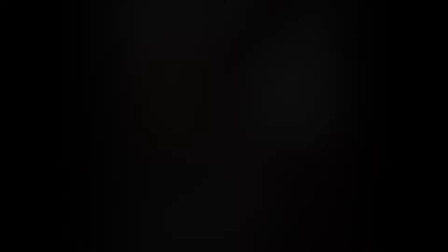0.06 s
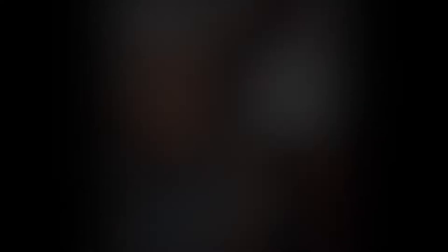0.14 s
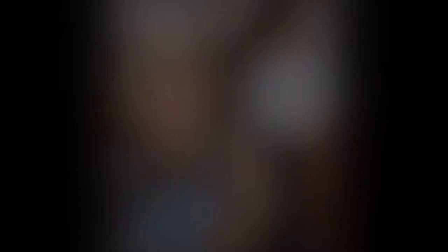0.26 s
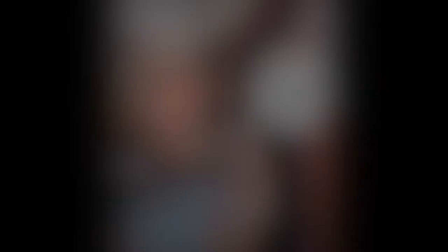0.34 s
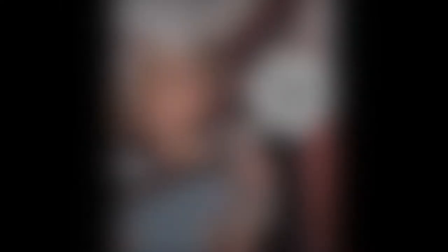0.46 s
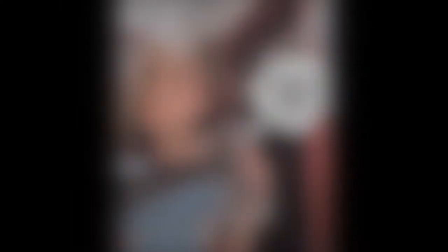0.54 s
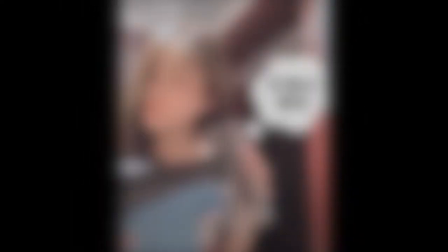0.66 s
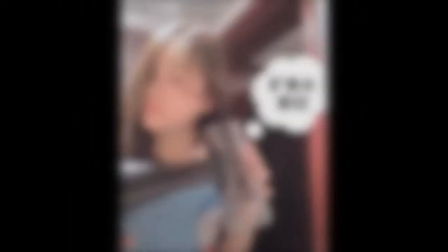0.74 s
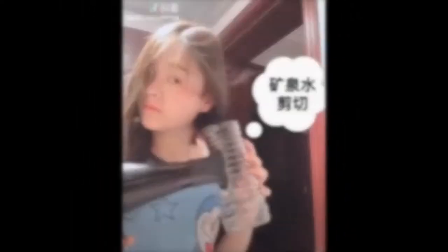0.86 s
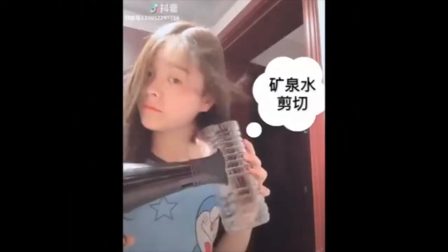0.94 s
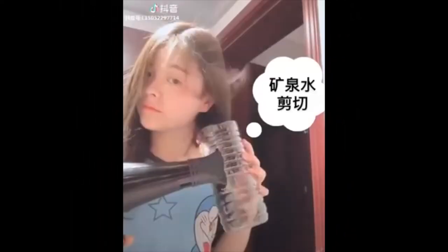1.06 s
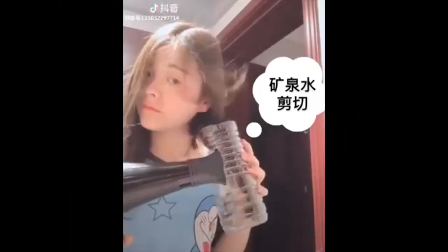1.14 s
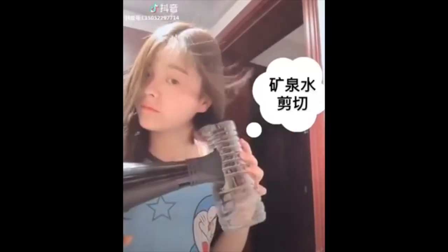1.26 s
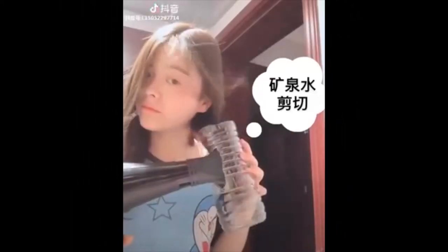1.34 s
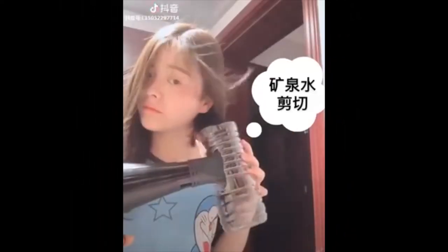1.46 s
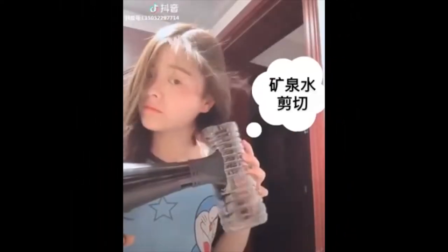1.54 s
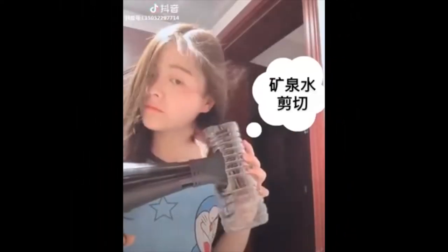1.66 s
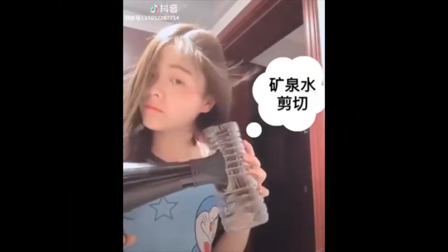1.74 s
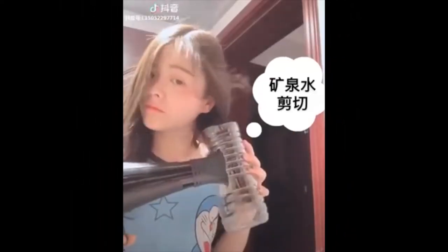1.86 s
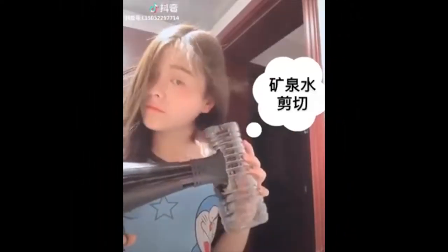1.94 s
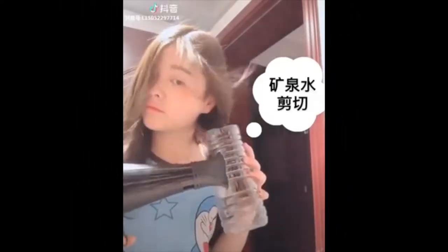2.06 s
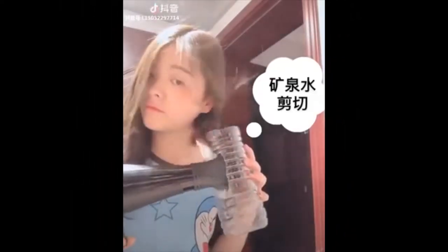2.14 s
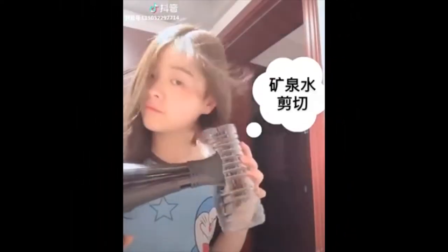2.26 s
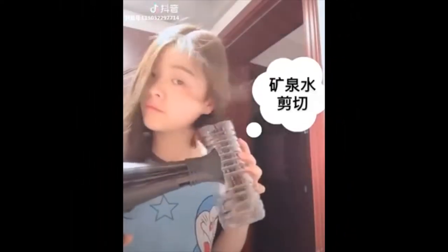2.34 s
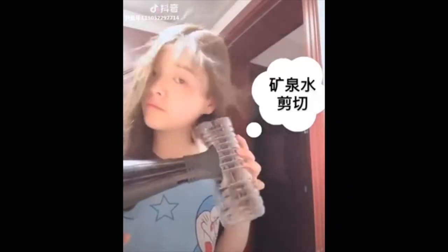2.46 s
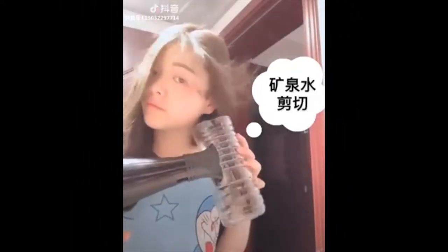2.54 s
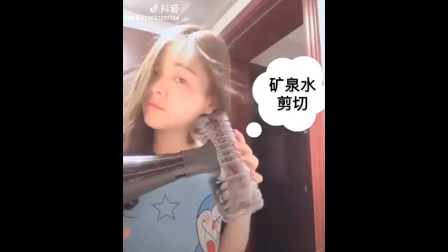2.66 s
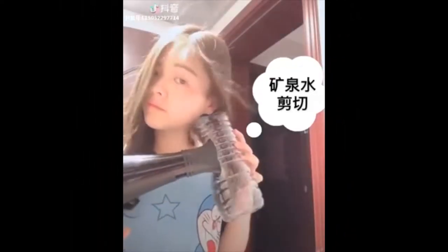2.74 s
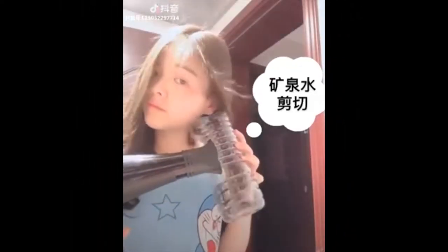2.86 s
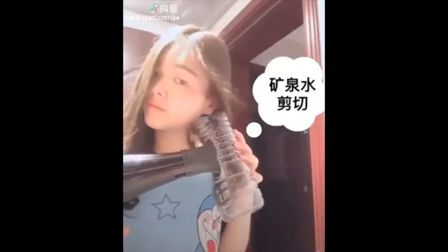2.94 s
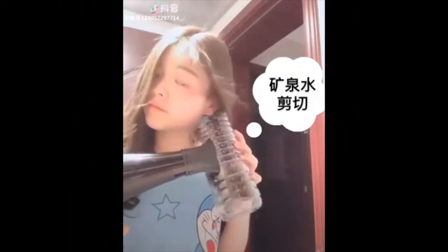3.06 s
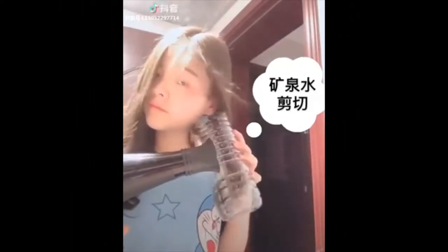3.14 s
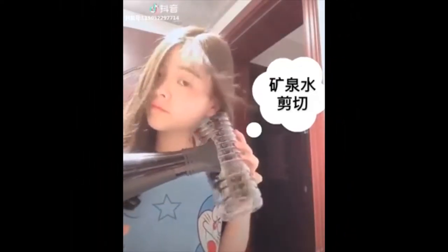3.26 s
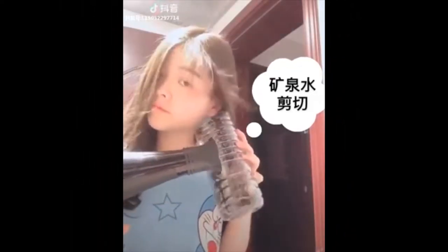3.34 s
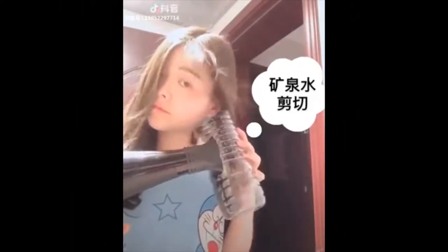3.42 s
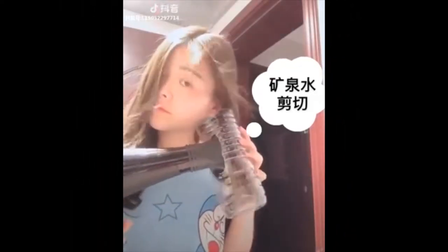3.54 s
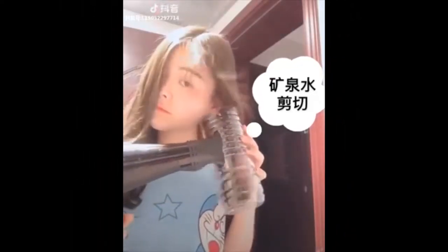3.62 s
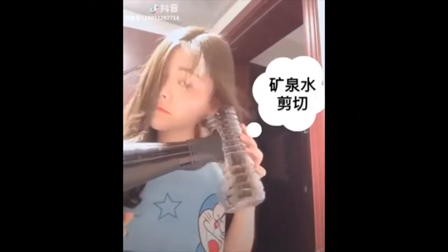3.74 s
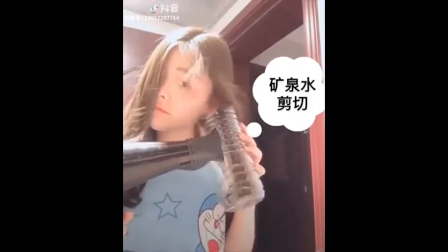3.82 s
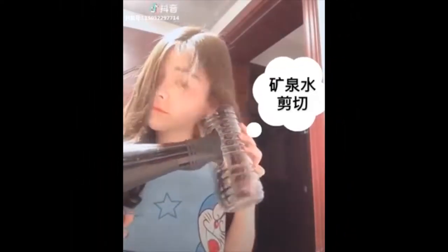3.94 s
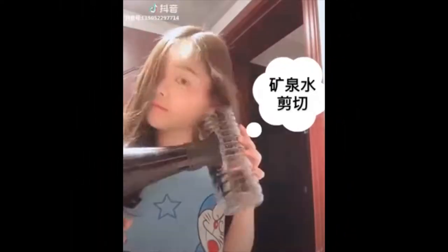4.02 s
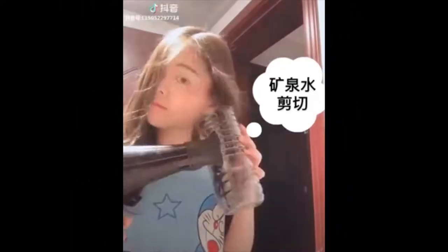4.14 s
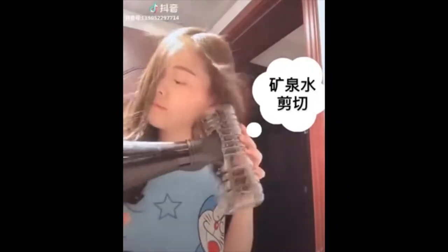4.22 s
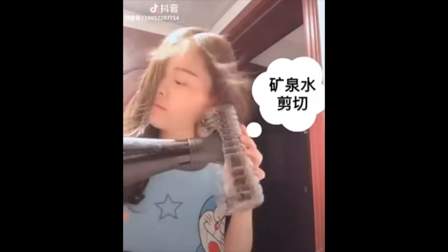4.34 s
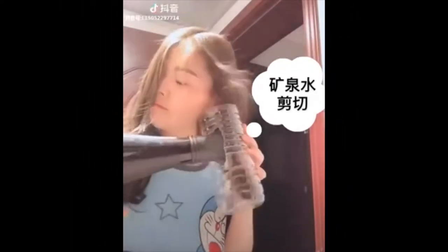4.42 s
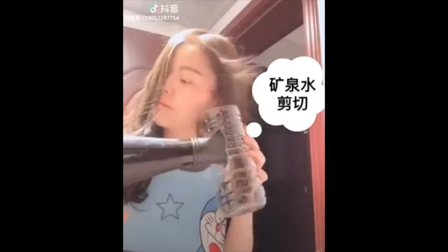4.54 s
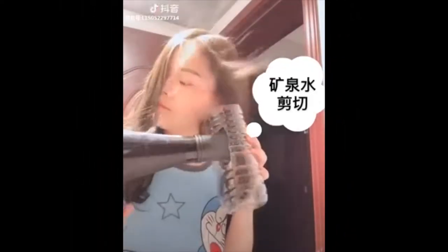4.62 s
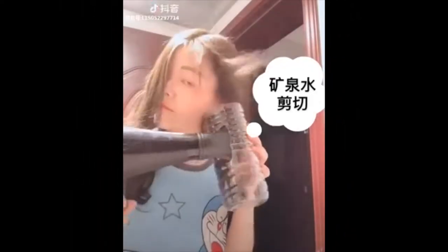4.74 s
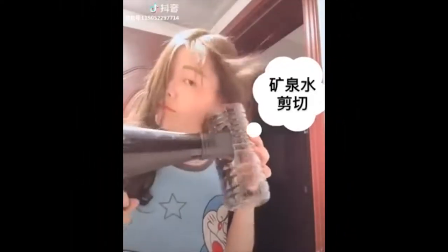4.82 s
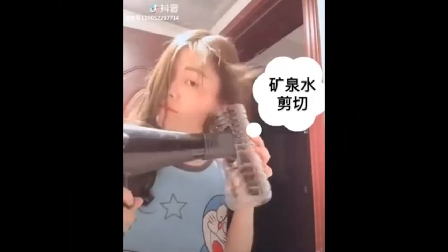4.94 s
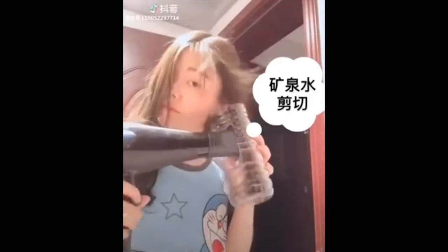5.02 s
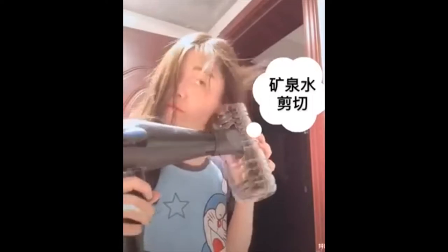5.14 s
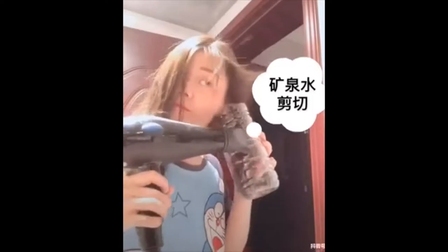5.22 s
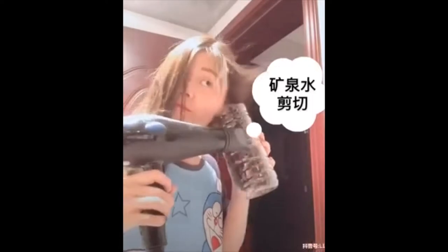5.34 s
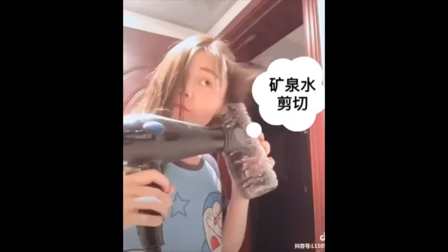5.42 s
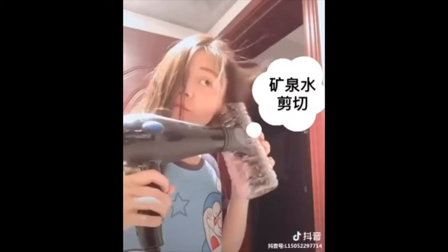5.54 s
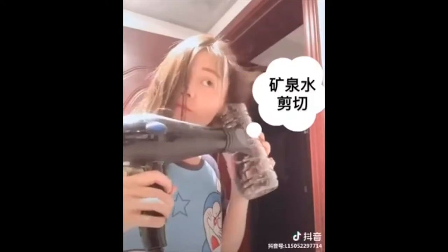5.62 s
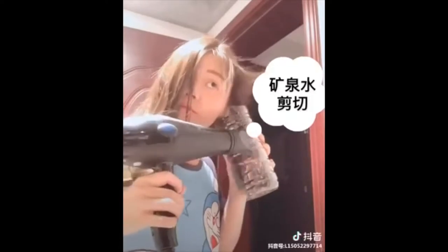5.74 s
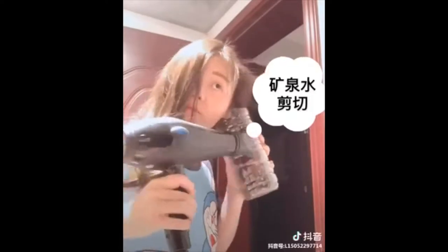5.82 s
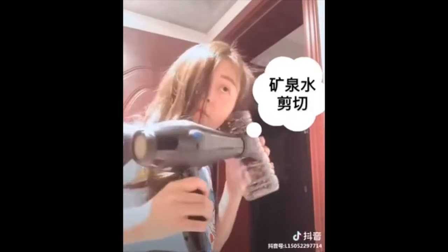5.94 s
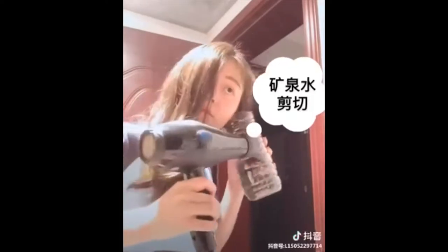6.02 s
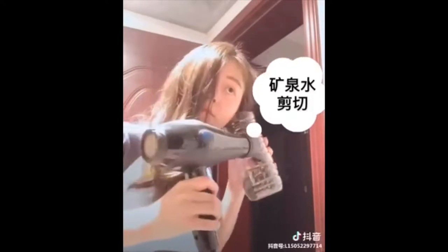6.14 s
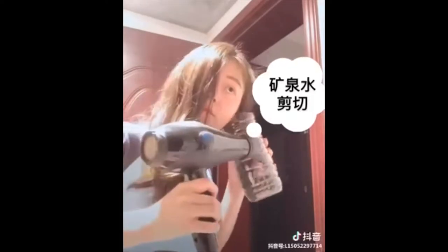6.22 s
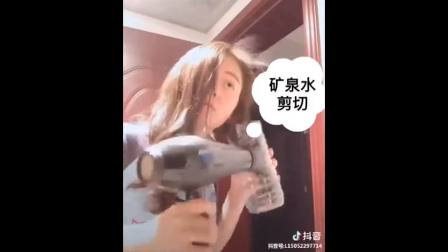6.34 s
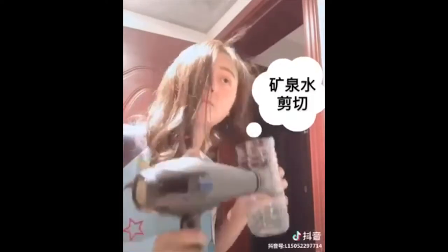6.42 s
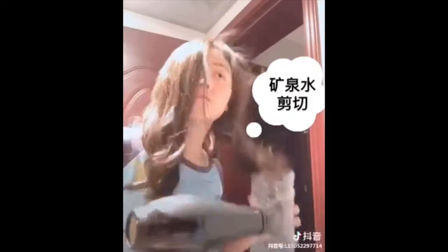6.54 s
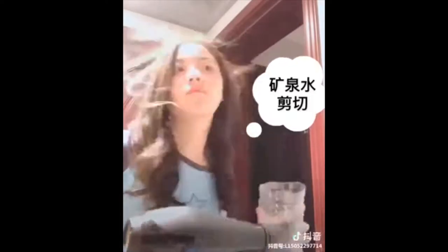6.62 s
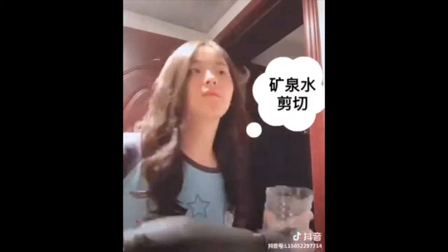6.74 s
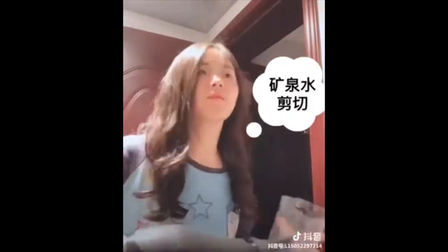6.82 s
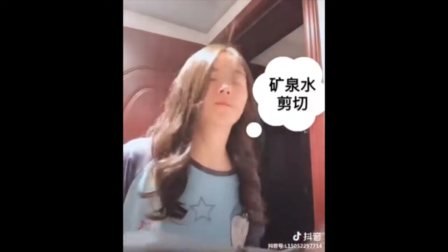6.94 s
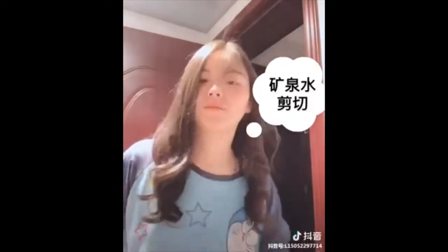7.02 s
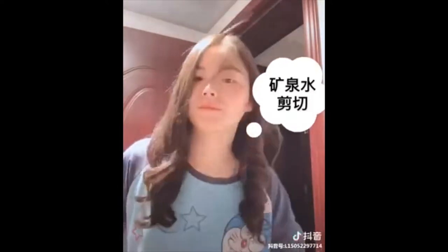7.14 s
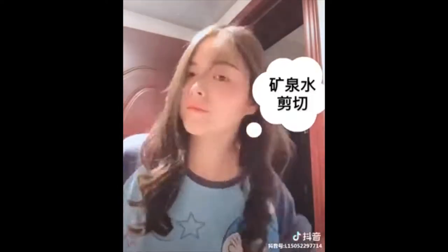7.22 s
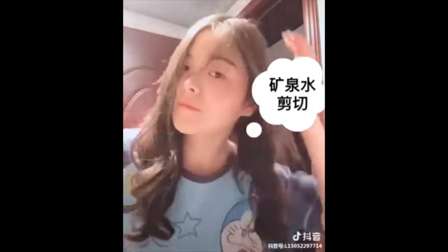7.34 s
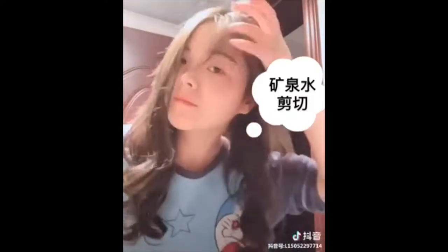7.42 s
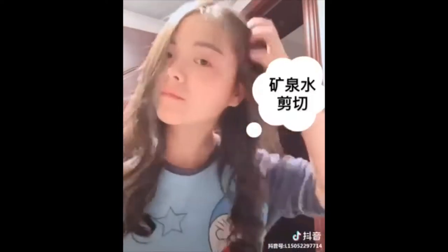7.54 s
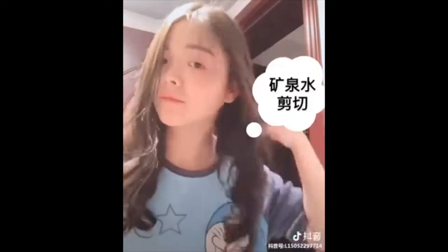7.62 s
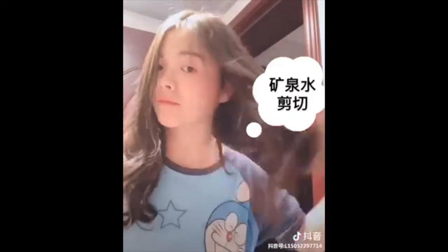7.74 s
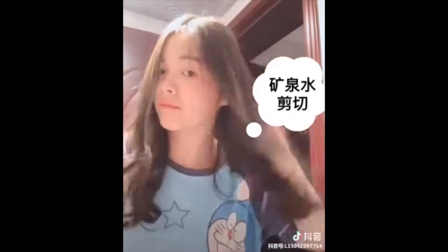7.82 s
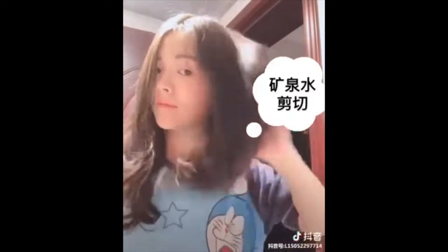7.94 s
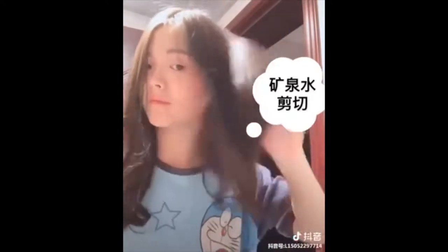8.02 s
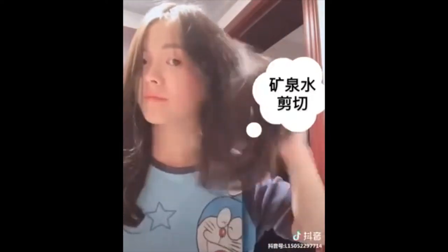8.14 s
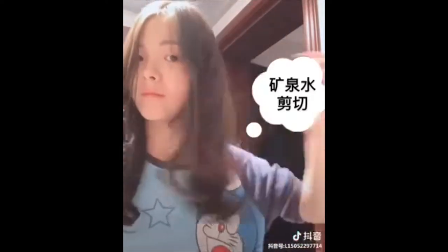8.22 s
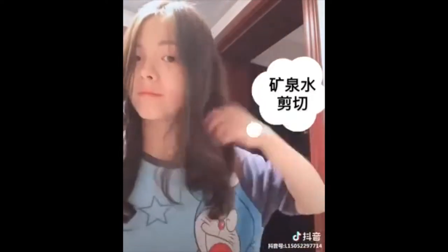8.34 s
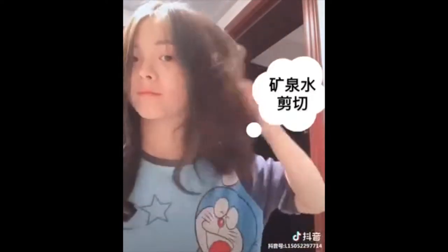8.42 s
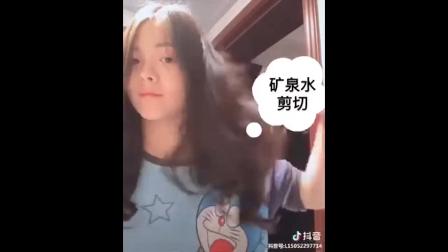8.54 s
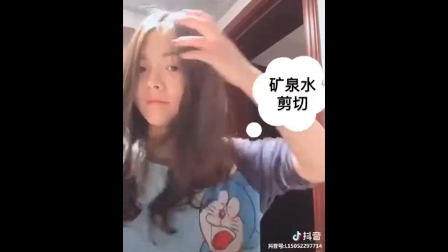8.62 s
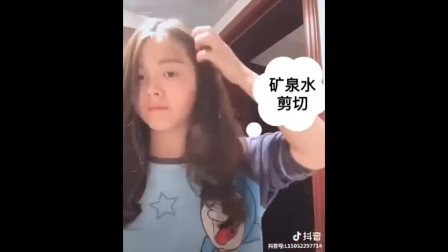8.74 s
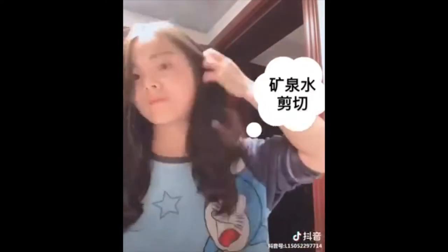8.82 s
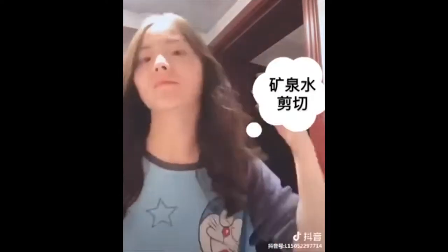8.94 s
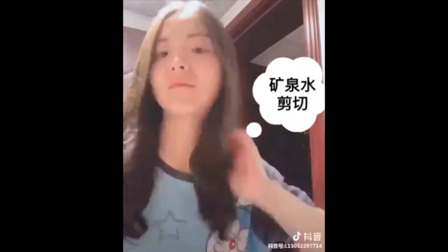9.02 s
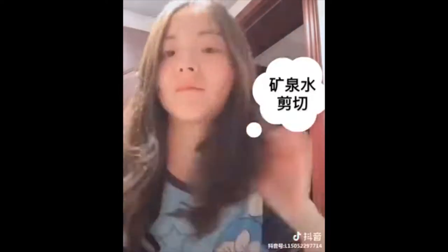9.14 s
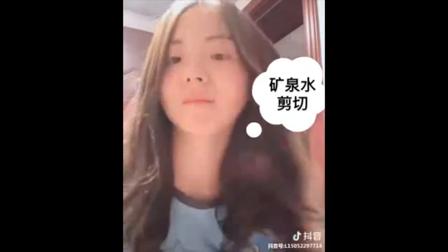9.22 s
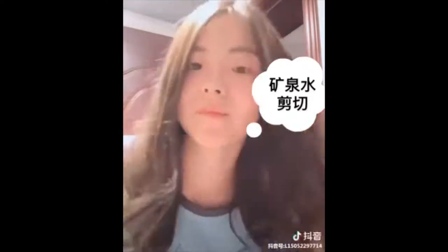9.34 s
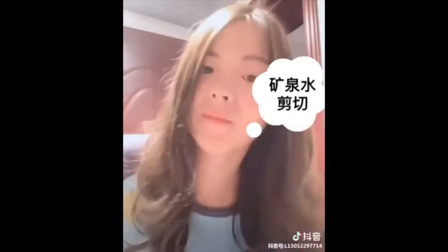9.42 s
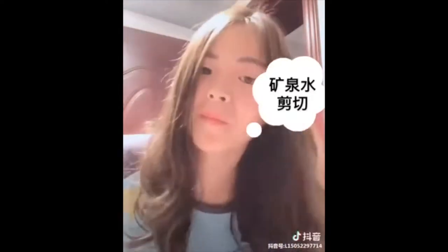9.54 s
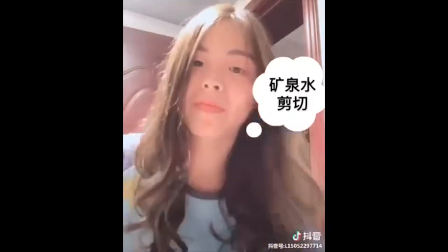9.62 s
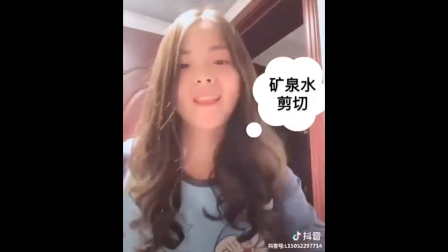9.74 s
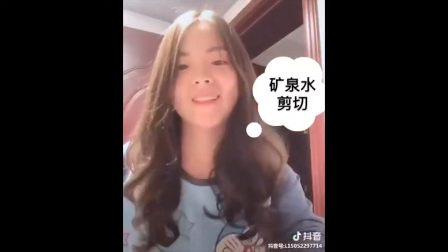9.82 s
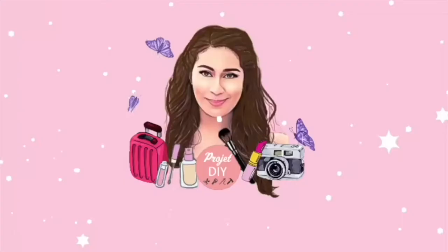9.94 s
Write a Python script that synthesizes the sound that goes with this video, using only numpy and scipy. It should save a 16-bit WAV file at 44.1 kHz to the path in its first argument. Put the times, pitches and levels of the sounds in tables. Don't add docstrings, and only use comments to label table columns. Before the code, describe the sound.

Smoothly fading in from silence, rough blown air roars through a plastic bottle, close and nearly mono, with fluttering resonances. After several steady seconds it swells into a sharper hiss, winds down quickly, and the dryer knocks and drops on a resonant tabletop, distorting briefly and bouncing. The small room falls quiet apart from low murmur, dull distant thuds, soft brushing, small ticks and final light taps.

```python
import sys
import numpy as np
from scipy import signal
from scipy.io import wavfile
from scipy.ndimage import uniform_filter1d

SR = 44100
rng = np.random.default_rng(int(sys.argv[2]) if len(sys.argv) > 2 else 0)


def int16_out(signal):
    q = np.round(np.clip(np.atleast_2d(signal).T, -1, 1) * 32767)
    wavfile.write(sys.argv[1], SR, q.astype(np.int16))


def invert_db(x):
    u = np.asarray(x, float) / 20
    return 10 ** u


N = 439677
T = np.arange(N) / SR

# (pitch [Hz], level per Hz [dB])
AIR = [(24, -70.5), (40, -57.5), (85, -19), (173, -20.5), (213, -20), (395, -0.5), (519, -13.5), (749, -20),
       (986, -14), (1270, -16), (2050, -28), (2300, -27), (2580, -19.5), (4460, -20), (9500, -29.5),
       (12400, -68), (20900, -120)]
# (pitch [Hz], width [Hz], level [dB])
HOLLOWS = [(58.7, 40, -37), (166, 32, -34), (268.5, 27, -6.5), (313.9, 19.6, -1), (337, 23, -3.5),
           (391.6, 34, -1), (486.5, 17, -13.5)]
# (pitch [Hz], width [Hz], level [dB])
PIPES = [(536.4, 28, -2), (626, 16.6, -3), (802, 37, -6), (884, 20, -1), (1074, 26, -8.5), (1128, 60, -8.5),
         (1273, 53.5, -0.5), (1693, 90, -10), (1818, 64, -9), (2303, 93, -7.5), (2890, 21, -13),
         (3296, 88, -15)]
# (pitch [Hz], width [Hz], level [dB])
ROOM_TONES = [(92, 16.6, -22), (134.8, 26, -21.5), (222.7, 24.8, -9.5), (692.8, 16.7, -19)]
# (pitch [Hz], level [dB])
WHINE = [(4340, -44), (8680, -48)]
# (time [s], spread [s], pitch [Hz], width [Hz], level over the hiss [dB])
SWING = [(1.2, .5, 4400, 250, -17), (3, 1.2, 3680, 200, -13.5), (4.6, 0.6, 3840, 300, -12),
         (5.95, 0.21, 6920, 900, -3), (6.05, 0.31, 6420, 500, -7.5), (6.301, 0.36, 5290, 400, -5),
         (6.45, 0.37, 4250, 400, -5.5), (6.6, 0.22, 6570, 350, -4), (6.301, 0.27, 9000, 600, -18)]
# (steady level [dB], share of the aim gain, run-down [dB per s])
LAYERS = [
    (-21.5, 0.11, 70),
    (-28, 0.4, 106),
    (-32, 0.23, 86),
    (-46.5, 0.94, 94),
]
# (time [s], gain [dB])
AIM = [(0, -0.5), (1.4, 1), (3.2, -1), (4.4, 0.5), (5, 2), (5.5, 5), (5.9, 5.5), (6.25, 7), (6.55, 6),
       (6.7, 7.5)]
SWITCH_OFF_S, CUT_S = 6.695, 6.97

# (time [s], boom level [dB], crack level [dB], crack spread [s])
BLOWS = [(6.895, -20, -30, .023), (7.011, -10, -21, .012), (7.026, -24, -28, 0.015),
         (7.258, -7, -33.5, 0.01), (7.267, 5.5, -26.5, .0091), (7.279, -8, -40, .006),
         (7.296, -4, -34.5, .011), (7.315, -0.5, -35, .0047), (7.335, 5, -30, .0072),
         (7.355, -20, -31, .01), (7.386, -8, -34, .011), (7.407, -11, -40.5, .0076), (7.423, -8, -51, .01),
         (7.444, -9.5, -46, .01), (7.48, -11.5, -31, .015), (7.499, -9, -48, .01),
         (7.521, -14, -45.5, .017), (7.566, -9, -39, .012), (7.597, -12.5, -43, .011),
         (7.64, -15, -42, .015), (7.672, -13, -44, .017), (7.705, -16, -57, .012)]
# (pitch [Hz], level [dB], time to fade by 60 dB [s])
TABLE = [(400, 0.5, 0.066), (361.3, -15, .12), (470, -18.5, 0.071), (242, -21.5, 0.21), (830, -29, .06),
         (620, -31.5, 0.11), (1585, -32.5, .08)]
# (pitch [Hz], width [Hz], level [dB])
SHELL_DULL = [(490, 30, 14), (1130, 69, -3.5), (1410, 150, 0.5), (2130, 160, -0.5), (2690, 920, -5.5),
              (1475, 6100, -15.5)]
# (pitch [Hz], width [Hz], level [dB])
SHELL_BRIGHT = [(4250, 700, 4.5), (5160, 120, -1), (5430, 450, 2), (6850, 550, 3.5), (8600, 2500, -10),
                (11800, 3000, -23.5)]
# (time [s], level [dB], dying away [dB per s])
SHAKES = [
    (7.018, -25.5, 501.5),
    (7.29, -11.5, 90.5),
    (7.424, -13, 104),
]
# (time [s], level [dB], dying away [dB per s])
RATTLES = [
    (7.04, -44, 150),
    (7.265, -50.5, 60),
    (7.4, -55.5, 41),
    (7.5, -54, 53),
    (7.63, -63.5, 51),
]
RATTLE_BRIGHT = (1.4, .25)
DROP_S = 7.2

# (time [s], level [dB], spread [s], pitch [Hz])
SQUEAKS = [(7.015, -29, 0.023, 2150), (7.02, -20, 0.011, 490), (7.245, -47, .0056, 6100),
           (7.272, -22, 0.0045, 1190), (7.329, -31, 0.0045, 5790), (7.34, -22, .005, 1219),
           (7.39, -40, .01, 2920), (8.75, -72, .051, 4700), (8.8, -77.5, 0.075, 3720),
           (9.79, -63, .013, 11870), (9.9, -71, .012, 4650), (9.9, -66, .008, 8500),
           (9.93, -63, .012, 1300), (9.95, -59, .012, 7100)]
# (time [s], level [dB], spread [s], centre pitch [Hz])
BRUSHES = [(7.95, -69, .02, 6000), (8.02, -70, .015, 4000), (8.12, -69, .016, 4500), (8.2, -64, .013, 5930),
           (8.35, -68.5, .01, 5020), (8.55, -76, 0.032, 3000), (8.88, -68, 0.06, 9000),
           (9.32, -63, .023, 8440), (9.575, -73, .013, 8460)]
# (time [s], level [dB], lowest resonance [Hz])
TICKS = [
    (9.485, -62.5, 1790),
    (9.575, -60, 2450),
]
# (time [s], level [dB])
TAPS = [
    (9.864, -38),
    (9.878, -36),
    (9.925, -35),
]
# (pitch [Hz], level [dB], time to fade by 60 dB [s])
STAND = [(442, 2, 0.034), (890, -9.5, 0.056), (1155, -19, 0.055), (290, -13, .05)]

# (pitch [Hz], level per Hz [dB])
ROOM = [(18, -53), (30, -17.5), (58, -31), (97, -6.5), (141, -8), (182, -16), (432, -13), (466, -18),
        (836, -27.5), (1160, -33.5), (1430, -29), (1980, -32.5), (8000, -45.5), (13000, -43.5)]
# (time [s], level [dB], dying away [dB per s])
STIRS = [
    (6.97, -43, 55),
    (7.6, -58, 41),
]
# (time [s], level [dB], spread [s])
THUDS = [(7.0, -47, 0.039), (7.33, -42, 0.054), (7.95, -67, 0.11), (8.25, -57, 0.042), (8.55, -51.5, 0.047),
         (8.78, -48.5, 0.027), (9.2, -60.5, 0.089), (9.72, -57.5, .04), (9.9, -60.5, 0.032)]

# (low edge [Hz], high edge [Hz],
# share of time dropped, leftover at low edge [dB], in the middle [dB], at high edge [dB])
DROPPED = [(9650, 10340, .975, 8, -40, 7), (10340, 11030, .05, 0, 0, 0), (11030, 11720, .99, 11, -24, -8),
           (11720, 12400, .6, -14, -28, 11), (12400, 13130, .05, 0, -3, -3)]
# (from [s], to [s])
LOUD_SPANS = [
    (.2, 6.88),
    (6.96, 7.015),
    (7.26, 7.39),
]


def dryer():
    roar, jet, hiss, top = dryer_levels()
    air = coloured(AIR, patchy_db=.5)
    white = rng.standard_normal((4, N))

    hollow = resonate(resonate(white[0], HOLLOWS), [(306, 730, 0)])
    for hz, width, _ in ROOM_TONES:
        hollow += resonate(resonate(white[3], [(hz, width, _)]), [(hz, width, 3)])
    low = rms_one(hollow) * invert_db(0.29 * drift(21))

    pipes = 0
    for k, mode in enumerate(PIPES):
        pipes = pipes + (-1) ** k * invert_db(1.3 * drift(0.76)) * resonate(white[1], [mode])
    middle = rms_one(1.15 * rms_one(pipes) + rms_one(band(air, 496, 2930)))

    high = rms_one(band(air, 3450, 9860, order=3))
    for s, spread, hz, width, db in SWING:
        lit = rms_one(band(white[0], hz - width / 2, hz + width / 2))
        high += invert_db(db) * bump(s, spread) * lit
    jet_tones = [(3796, 63, 4), (4075, 42, 6), (5390, 60, 0.0), (6830, 100, 0.5)]
    high += 0.35 * rms_one(resonate(white[1], jet_tones))

    wobbly_time = T + np.cumsum(.003 * drift(5)) / SR
    whine = 0
    for hz, db in WHINE:
        whine = whine + invert_db(db + 32 + 2.5 * drift(6)) * np.sin(2 * np.pi * hz * wobbly_time)

    treble = invert_db(4.5) * rms_one(band(white[2], 9270, 13400, order=3))
    return roar * low + jet * middle + hiss * (high + whine) + top * treble


def dryer_levels():
    aim_db = np.interp(T, *np.transpose(AIM))
    since_off = np.maximum(T - SWITCH_OFF_S, 0)
    running = T < CUT_S
    return [invert_db(db + share * aim_db - fall * since_off) * running for db, share, fall in LAYERS]


def table():
    s, boom_db, crack_db, spread = np.transpose(BLOWS)
    bright = np.where((s > 6.95) & (s < 7.1), 0.88, .1)
    dull = rms_one(resonate(rng.standard_normal(N), SHELL_DULL))
    sharp = rms_one(resonate(rng.standard_normal(N), SHELL_BRIGHT))
    puffs = [invert_db(db) * bump(at, wide) for at, db, wide in zip(s, crack_db, spread)]
    crackle = sum(puffs) * dull + bright @ puffs * sharp

    top_modes = [(394.0, 40.7, 6.5), (350, 57, 1), (250, 19, -10.0), (496, 60, -8),
                 (160, 60, -19.0), (590, 80, -21.5), (857, 55, -25.5)]
    shaking = rms_one(resonate(rng.standard_normal(N), top_modes))
    rattle = dull + np.where(T < DROP_S, *RATTLE_BRIGHT) * sharp
    loose = swell(SHAKES, rise_db_per_s=650) * shaking + swell(RATTLES, rise_db_per_s=500) * rattle
    gate = invert_db(-180 * np.maximum(T - 7.71, 0))
    return strike(s, boom_db, TABLE) + crackle + gate * loose


def rustles():
    patchy = invert_db(4 * uniform_filter1d(rng.standard_normal(N), size=64) * 8)
    grain = rng.standard_normal(N) * patchy
    rows = [(s, db, spread, hz, 63 + 0.04 * hz) for s, db, spread, hz in SQUEAKS]
    rows += [(s, db, spread, hz, 7900) for s, db, spread, hz in BRUSHES]
    for s, db, hz in TICKS:
        for k, part_db in enumerate((-1.5, 0.7, -9)):
            rows.append((s, db + part_db, 0.018, hz + k * 910, 370))
    rubbing = 0
    for s, db, spread, hz, width in rows:
        rubbing = rubbing + invert_db(db) * bump(s, spread) * rms_one(resonate(grain, [(hz, width, 0)]))
    return rubbing + strike(*np.transpose(TAPS), STAND)


def quiet_room():
    level = invert_db(-56) + swell(STIRS, rise_db_per_s=150)
    white = rng.standard_normal(N)
    murmur = rms_one(coloured(ROOM, patchy_db=1.2))
    tones = rms_one(resonate(white, [(1510, 60, -1.5), (854, 66, -1), (11030, 15, -10)]))
    hum = rms_one(resonate(white, [(95, 24, -0.34), (130, 20, -2)]))
    thuds = hum * sum(invert_db(db) * bump(s, spread) for s, db, spread in THUDS)
    return level * (murmur + invert_db(-16.5) * tones) + thuds


def strike(s, blow_db, modes):
    luck = rng.standard_normal((len(s), len(modes)))
    out = np.zeros(N)
    for k, (hz, db, t60) in enumerate(modes):
        push = np.full(N, 1e-18)
        push[(s * SR).astype(int)] = invert_db(blow_db + db + 0.66 * luck[:, k])
        r, w = invert_db(-60 / (t60 * SR)), 2 * np.pi * hz / SR
        ringing = signal.lfilter([0, np.sin(w)], [1, -2 * r * np.cos(w), r * r], push)
        out += resonate(ringing, [(hz, 65, 0)])
    return out


def swell(rows, rise_db_per_s):
    gain = 0
    for s, db, fall in rows:
        below_db = np.where(T < s, rise_db_per_s * (s - T), fall * (T - s))
        gain = gain + invert_db(db - below_db)
    return gain


def bump(s, spread):
    return np.exp(-.5 * ((T - s) / spread) ** 2)


def coloured(spectrum, patchy_db):
    together = drift(7.2)
    white = rng.standard_normal((2, N))
    edges = 30 * 2 ** np.arange(0, 9, 1 / 3)
    hz, db = np.transpose(spectrum)
    out = 0
    for k, (low, high) in enumerate(zip(edges, edges[1:])):
        level_db = np.interp(np.log(low * high) / 2, np.log(hz), db)
        flutter = .6 * together + drift(14)
        out = out + invert_db(level_db + patchy_db * flutter) * band(white[k % 2], low, high)
    return out


def resonate(x, modes):
    out = 0
    for k, (hz, width, db) in enumerate(modes):
        r = np.exp(-np.pi * width / SR)
        feedback = [1, -2 * r * np.cos(2 * np.pi * hz / SR), r * r]
        out = out + (-1) ** k * invert_db(db) * signal.lfilter([1 - r, 0, r - 1], feedback, x)
    return out


def band(x, low_hz, high_hz, order=2):
    return signal.sosfilt(signal.butter(order, [low_hz, high_hz], "band", fs=SR, output="sos"), x)


def drift(rate_hz):
    r = np.exp(-80 * np.pi * rate_hz / SR)
    slow = signal.lfilter([1], [1, -2 * r, r * r], rng.standard_normal(N // 40 + 2002))
    slow = slow[2000:]
    return np.interp(np.arange(N) / 40, np.arange(len(slow)), rms_one(slow))


def rms_one(x):
    return x / np.sqrt(np.mean(x ** 2) + 1e-20)


def scene():
    fade = np.sin(np.pi / 2 * np.clip((T - 0.096) / 0.98, 0, 1)) ** 2
    fade = fade * (T > .142)
    return np.tile(fade * (dryer() + table() + rustles() + quiet_room()), (2, 1))


def dropped_treble(x):
    hz, s, centre = signal.stft(x, SR, nperseg=2048)
    loud = sum((s > a) & (s < b) for a, b in LOUD_SPANS) > 0
    centre[hz > DROPPED[-1][1]] = 0
    opposed = np.zeros_like(centre)
    for low, high, share, low_db, middle_db, high_db in DROPPED:
        mood = uniform_filter1d(rng.standard_normal(len(s)), size=4)
        in_band = ((hz >= low) & (hz < high))[:, None]
        gone = in_band & loud & (mood < np.quantile(mood, share))
        corners = [low + 50, low + 220, high - 220, high - 50]
        left_db = np.interp(hz, corners, [low_db, middle_db, middle_db, high_db])
        opposed += gone * centre * invert_db(left_db)[:, None]
        centre = centre * ~gone
    centre, opposed = (signal.istft(z, SR, nperseg=2048)[1][:N] for z in (centre, opposed))
    return centre + opposed * [[1], [-1]]


def low_pass(x):
    return signal.sosfilt(signal.butter(12, 14530, fs=SR, output="sos"), x)


def record(dry):
    overloaded = np.clip(dry[0], -.95, .95)
    mix = dropped_treble(overloaded)
    return low_pass(mix)


dry = scene()
out = record(dry)
int16_out(out)
```